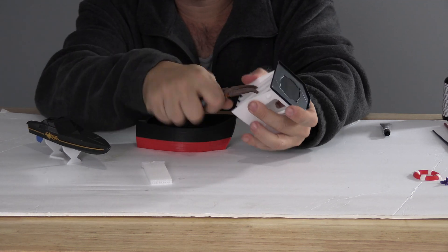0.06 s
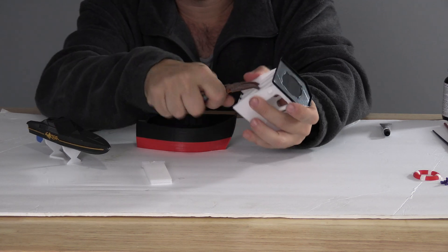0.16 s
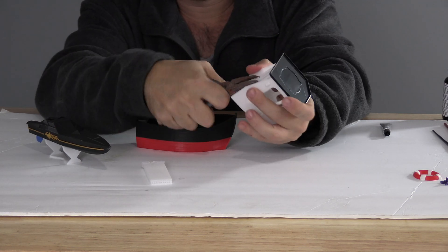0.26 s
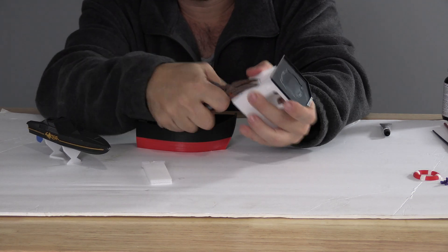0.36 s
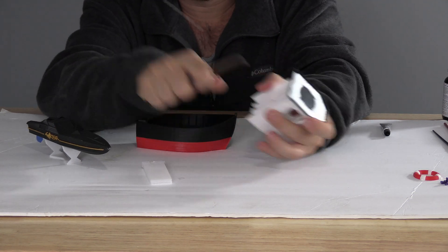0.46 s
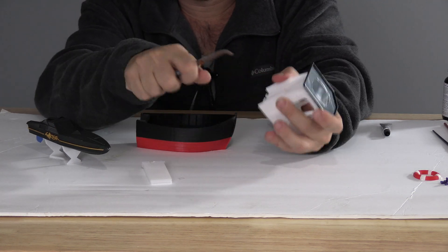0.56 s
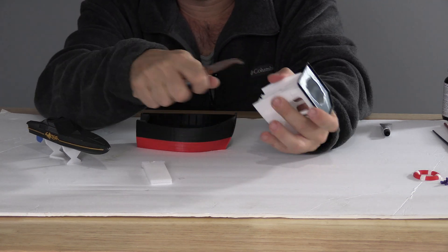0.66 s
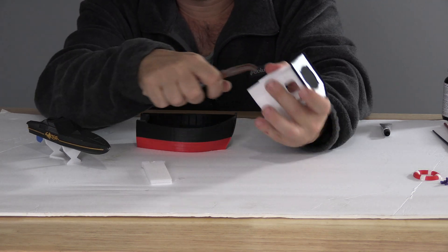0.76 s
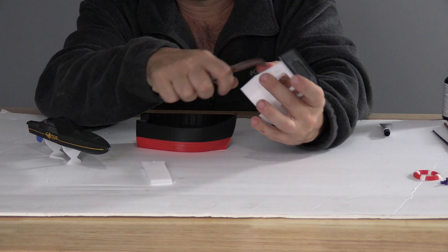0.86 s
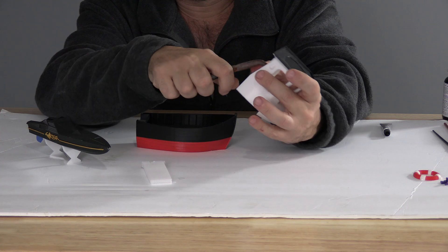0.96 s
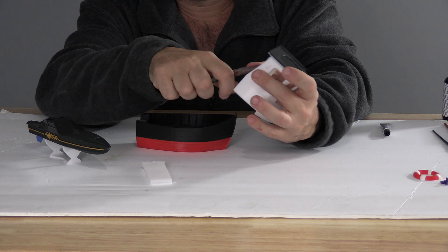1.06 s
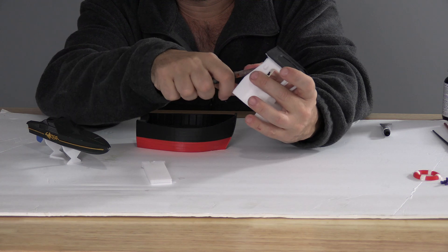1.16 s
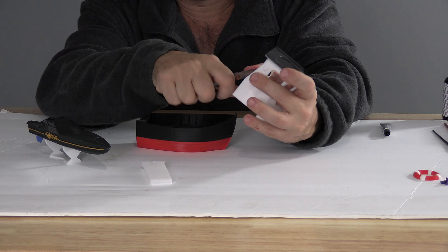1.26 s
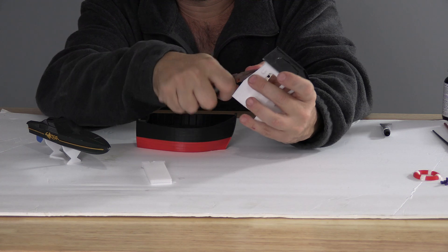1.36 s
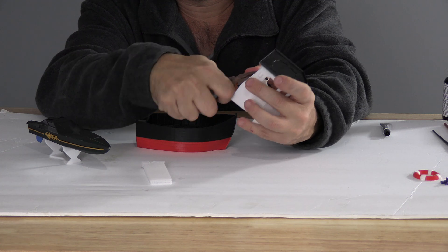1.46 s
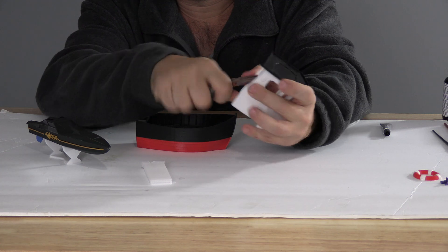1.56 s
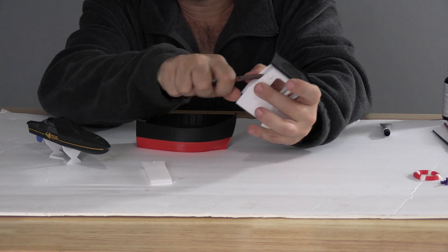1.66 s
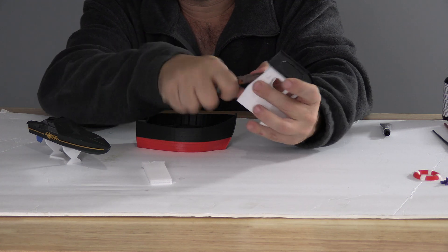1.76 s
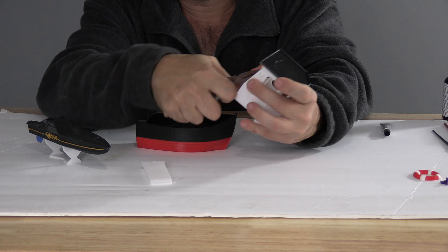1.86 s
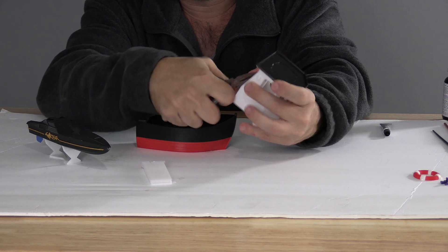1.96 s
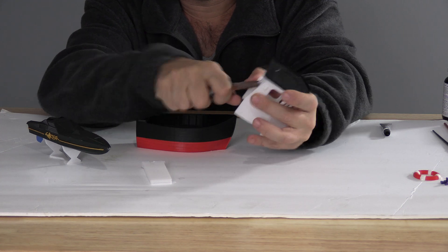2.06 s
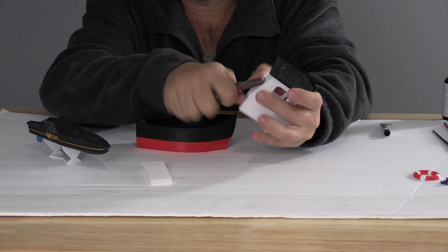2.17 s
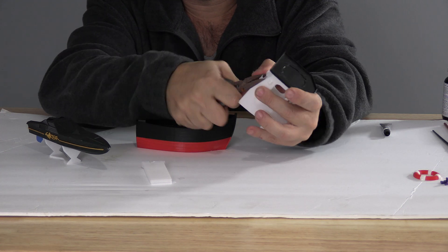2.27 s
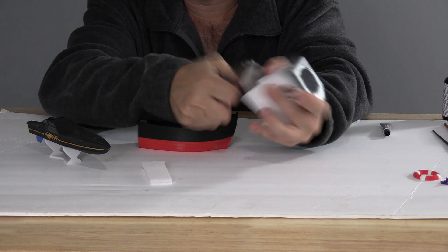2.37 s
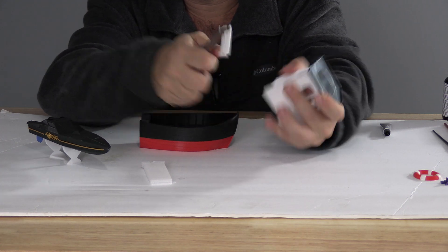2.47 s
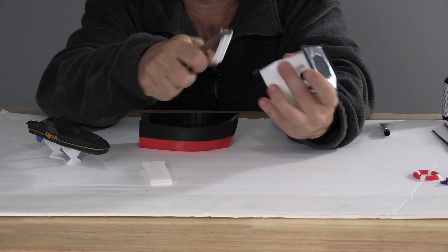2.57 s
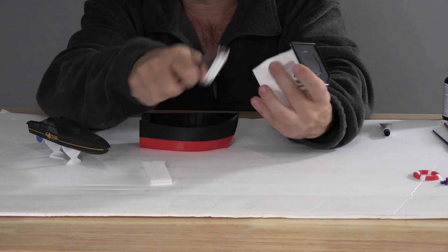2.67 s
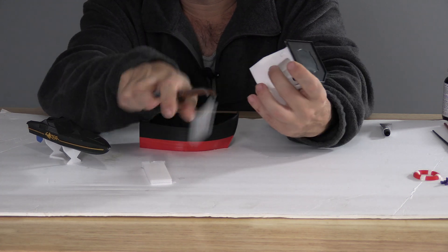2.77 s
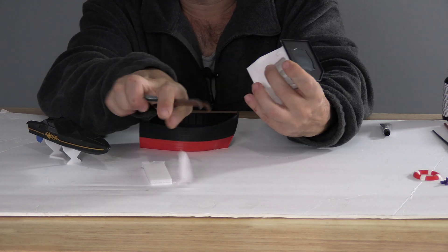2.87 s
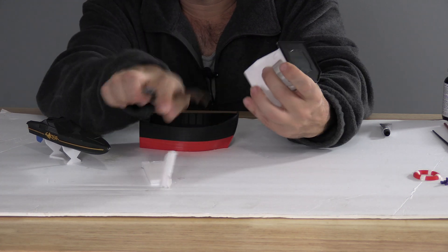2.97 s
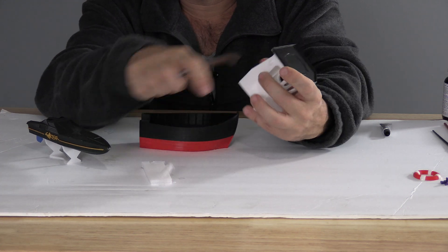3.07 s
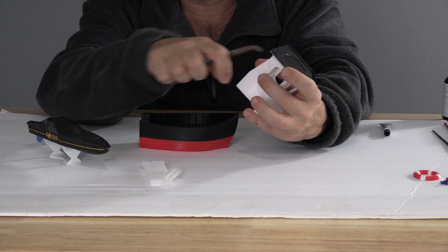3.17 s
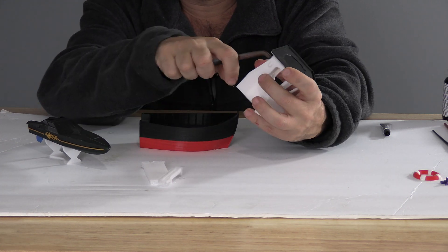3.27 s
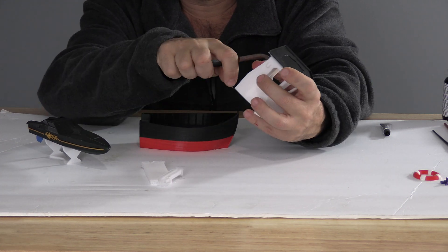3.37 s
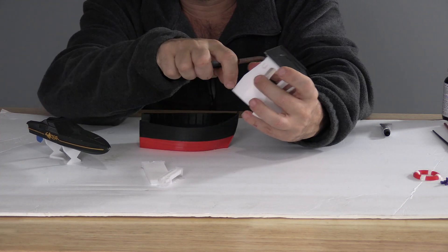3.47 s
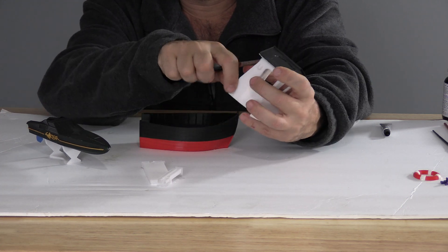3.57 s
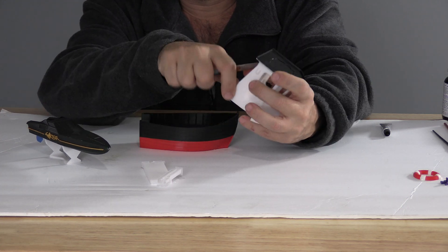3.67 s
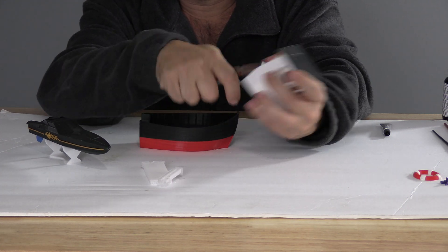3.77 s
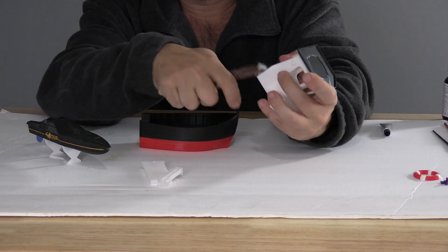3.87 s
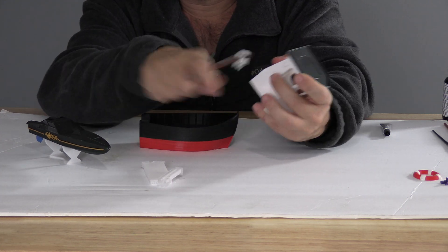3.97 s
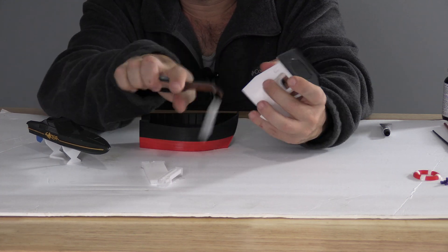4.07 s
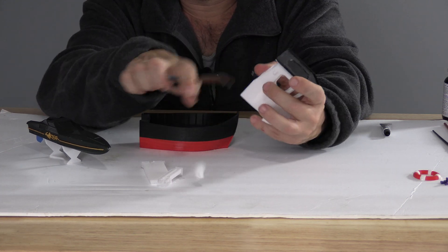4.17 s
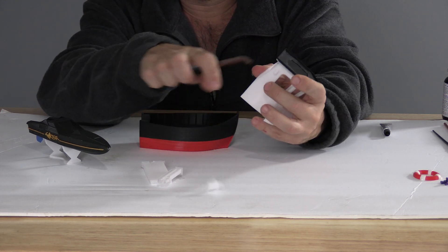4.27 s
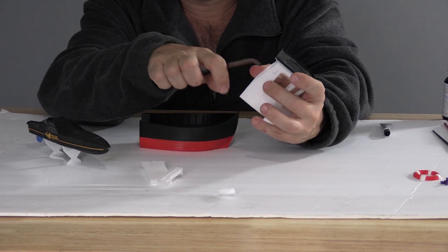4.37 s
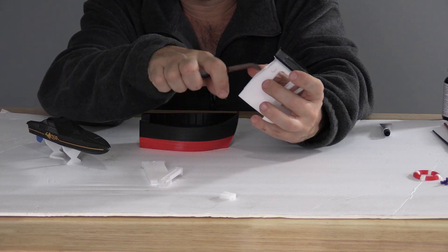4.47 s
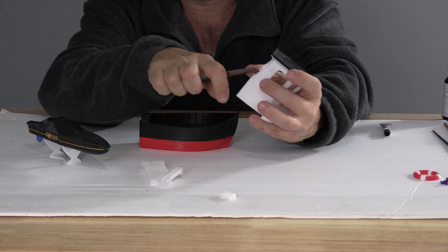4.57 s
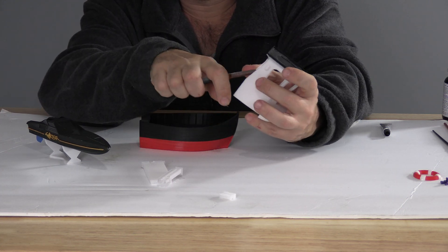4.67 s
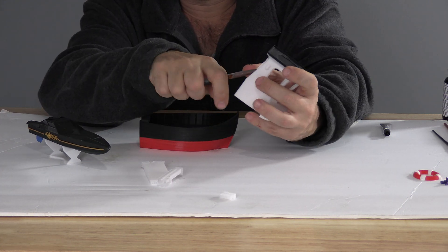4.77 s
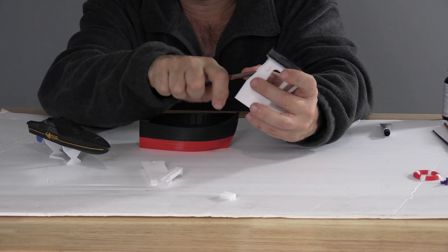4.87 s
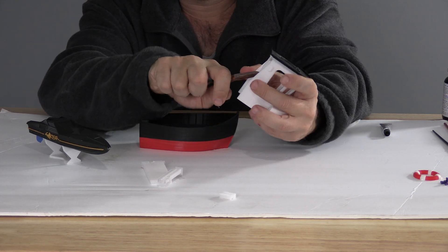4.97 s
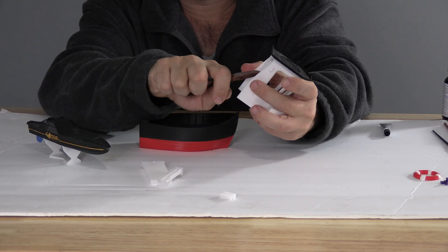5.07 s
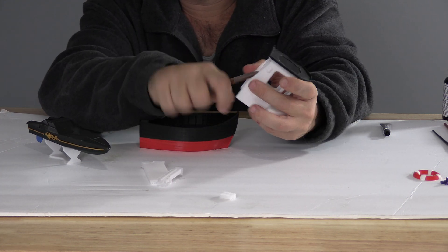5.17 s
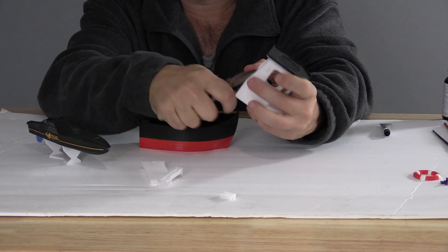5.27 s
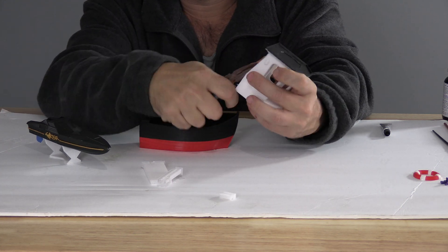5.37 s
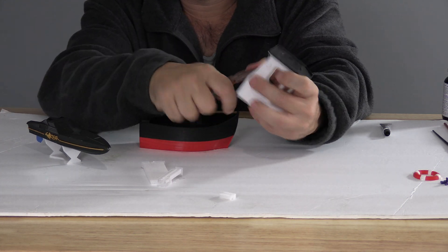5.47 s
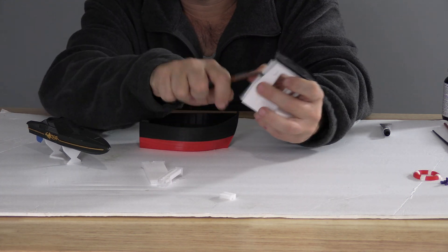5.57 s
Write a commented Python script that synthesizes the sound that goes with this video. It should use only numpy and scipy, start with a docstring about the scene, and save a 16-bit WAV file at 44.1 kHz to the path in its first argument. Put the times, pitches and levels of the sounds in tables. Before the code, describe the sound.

Close, dry bursts of brittle plastic cracks and loud snaps from pliers, then light clattering bits on a covered tabletop and more snaps.

```python
"""Pliers break plastic supports out of a hollow printed part, close to a microphone above a table in a small room.
Struts crack at once and whole blocks soon snap away: short noisy forces ring the part's resonances.
Near 3 s, and again after 4 s, loose pieces bounce on the table in shrinking hops; then come two more snaps.
Scrapes made of tiny slips, gliding squeaks, dull knocks and sleeve rustle fall in between, over steady room air.
A fast limiter flattens the loudest peaks."""
import sys
import numpy as np
from scipy import signal
from scipy.fft import rfft, irfft
from scipy.io import wavfile
from scipy.ndimage import uniform_filter1d, minimum_filter1d

SR = 44100
rng = np.random.default_rng(int(sys.argv[2]) if len(sys.argv) > 2 else 0)


def master_out(mix):
    """Clip the mix to full scale and print it as 16-bit PCM to the path in sys.argv[1]."""
    frames = np.transpose(np.atleast_2d(mix))
    ceiling = np.clip(frames, -1, 1)
    pcm = np.round(ceiling * 32767).astype(np.int16)
    wavfile.write(sys.argv[1], SR, pcm)


N = 248283
SIZE = 8192  # samples in one event, 0.186 s
T = np.arange(SIZE) / SR


def undb(db):
    """Logarithmic level: decibels to amplitude gain."""
    return 10 ** (np.asarray(db) / 20)


def unit(x):
    """Normalization: scale to rms 1."""
    return x / np.sqrt(np.mean(x ** 2) + 1e-30)


def smooth_twice(x, size):
    """Low-pass averaging: two running means in a row."""
    return uniform_filter1d(uniform_filter1d(x, size=size), size=size)


def add(track, start_s, sound):
    """Superposition: mix a sound into a track at a time."""
    i = max(int(start_s * SR), 0)
    track[i:i + len(sound)] += sound[:max(N - i, 0)]


def along(points, hz):
    """Interpolation of (frequency, value) points on a logarithmic frequency axis."""
    f, value = np.transpose(points)
    return np.interp(np.log(hz + 1), np.log(f), value)


def bins(size):
    """Fourier analysis: frequencies of a spectrum in Hz."""
    return np.fft.rfftfreq(size, 1 / SR)


def causal(gain):
    """Minimum phase: the response with these gains that starts at once and then rings."""
    cepstrum = irfft(np.log(gain + 1e-12))
    cepstrum[1:SIZE // 2] *= 2
    cepstrum[SIZE // 2 + 1:] = 0
    return np.exp(rfft(cepstrum))


def lorentzian(hz, width_hz):
    """Damped resonance: power against frequency, 1 at the peak and half at the edges of the width."""
    return 1 / (1 + (2 * (bins(SIZE) - hz) / width_hz) ** 2)


def resonance(hz, width_hz, db):
    """Single mode: gain that lifts one resonance above a flat response."""
    return np.sqrt(1 + undb(db) ** 2 * lorentzian(hz, width_hz))


SCATTER_DB = 3  # standard deviation of mode levels and tick levels
DETUNE = .012  # standard deviation of mode frequencies, as a fraction
RIPPLE_DB = 2.6  # rms ripple of the colour


def body(colour, modes):
    """Modal response: every contact point and grip weights and shifts the resonances a little differently."""
    f, power = bins(SIZE), 1
    for hz, width_hz, db in modes:
        level_shift, pitch_shift = rng.standard_normal(2)
        peak = undb(db + SCATTER_DB * level_shift) ** 2 * 2
        power = power + peak * lorentzian(hz * (1 + DETUNE * pitch_shift), width_hz)
    # many weak modes add a random ripple to the colour, drawn anew for every sound
    weak_modes = unit(smooth_twice(rng.standard_normal(len(f)), 26))
    return undb(along(colour, f) + RIPPLE_DB * weak_modes) * np.sqrt(power)


def fracture(crumble_s, crumble_db, burst_s=0.00095, grain_db=5):
    """Brittle fracture: a very short burst of force, then uneven micro-cracks as the edges let go."""
    burst, grains = rng.standard_normal((2, SIZE))
    grain_levels = np.repeat(rng.standard_normal(SIZE // 32), 32)  # one level per 32 samples
    sizes = unit(undb(grain_db * grain_levels))
    crumbling = undb(crumble_db) * grains * sizes * np.exp(-T / crumble_s)
    return burst * np.exp(-T / burst_s) + crumbling


# borders between the bass, mid, crack and top bands: border_hz
BAND_EDGES = [1200, 5500, 9000]


def strike(force, gain, band_db, span_s, evenness=0.18):
    """Forced vibration: a force rings an object, and each of four bands gets its own strength over span_s.
    Gives the sound towards the microphone and the sound sent all round the room."""
    band = np.searchsorted(BAND_EDGES, bins(SIZE))
    push = rfft(force)
    ripple = np.sqrt(uniform_filter1d(np.abs(push) ** 2, size=15) + 1e-12)
    sounds = []
    # parts of a force interfere in any one direction; summed over all directions their ripple evens out
    for shape in (gain / ripple ** evenness, gain / ripple):
        power = np.bincount(band, np.abs(push * shape) ** 2) * 2 / (SIZE * span_s * SR)
        correction_db = np.asarray(band_db) - 10 * np.log10(power)
        balance_db = uniform_filter1d(correction_db[band], size=90)  # soft borders between bands
        sounds.append(irfft(push * causal(shape * undb(balance_db))))
    return sounds


# resonances of the hollow part in the steel jaws, for snaps and cracks: pitch_hz, width_hz, level_db
PART_MODES = [(430, 110, -9.5), (950, 120, 1), (1660, 290, -1), (2017, 41, 3), (2830, 19, 10.5),
              (3070, 360, 4.5), (3550, 540, -0.5), (4080, 74, -5), (4600, 200, -3), (7256, 510, -2.5),
              (7900, 350, -4.5), (10240, 900, -4), (11040, 800, 3), (15000, 1100, -21)]
# broad colour of a snap: pitch_hz, level_db
SNAP_COLOUR = [(30, -0.5), (150, 2), (330, 8), (600, 7), (1200, 0.5), (2400, -5.5), (3100, -4.5),
               (4400, 3.5), (6000, 5), (7400, 10.5), (8900, 5.5), (12500, 2.5), (15600, 2.5),
               (17000, -29.5)]
# a block of support breaks away:
# start_s, level_db, bass_db (relative to the snap), crumble_s, ring_db (added for wall and jaws)
SNAPS = [(0.5280, 5, -38.5, 0.0023, 6), (1.547, -4.5, -35.5, 0.00057, 1.5), (1.9340, -4, -28, 0.0055, -2.5),
         (1.9698, -6, -50, 0.00085, -5.5), (2.041, -11.5, -34.5, 0.0022, -3.5),
         (2.3942, -7, -31.5, 0.0051, -2), (2.4754, -3.5, -33, 0.0075, 0.5),
         (5.1238, -2, -33.5, 0.0026, -19), (5.4069, -1, -26.5, 0.0043, -4)]


def snaps(mid_db=-19.5, crack_db=-12, top_db=-17, dulling=.5, room_db=-12,
          thump_db=-34, thump_hz=42, thump_s=0.0064,
          wall_hz=2980, wall_width_hz=350, wall_db=4, jaw_hz=7600, jaw_width_hz=900, jaw_db=-1):
    """Impulsive excitation: blocks ring wall and jaws; bigger breaks are duller and push the overloaded
    microphone into a louder low thump."""
    out = np.zeros((2, N))
    thump = undb(thump_db) * np.sin(2 * np.pi * thump_hz * T) * np.exp(-T / thump_s)
    for start_s, db, bass_db, crumble_s, ring_db in SNAPS:
        wall = resonance(wall_hz, wall_width_hz, wall_db + ring_db)
        jaws = resonance(jaw_hz, jaw_width_hz, jaw_db + ring_db)
        force = fracture(crumble_s, crumble_db=-5, burst_s=0.002)
        gain = body(SNAP_COLOUR, PART_MODES) * wall * jaws
        band_db = [bass_db, mid_db, crack_db, top_db - dulling * db]
        near, spill = strike(force, gain, band_db, span_s=0.0043)
        add(out[0], start_s, undb(db) * (near + thump))
        add(out[1], start_s, undb(db + room_db) * spill)
    return out


# the jaws bear down and the lattice ticks faintly: start_s, length_s, level_db (before scatter)
SQUEEZES = [(1.47, 0.028, -33.5), (2.148, .02, -41), (2.223, 0.037, -41.5), (3.75, .012, -45.5),
            (5.573, 0.042, -62)]
# a strut that only ticks: share passed to the hollow part, wall ring, strut ping
TICK_PART_DB, TICK_RING_HZ, TICK_PING_HZ = -23, 3300, 8600


def ticks(count=3):
    """Progressive failure: each squeeze breaks a few tiny struts at uneven moments."""
    rows = []
    for start_s, length_s, db in SQUEEZES:
        for k in range(count):
            tick_s = start_s + length_s * (k + rng.random()) / count
            tick_db = db + SCATTER_DB * rng.standard_normal()
            rows.append((tick_s, tick_db, TICK_PART_DB, TICK_RING_HZ, TICK_PING_HZ))
    return rows


# broad colour of a crack: pitch_hz, level_db
CRACK_COLOUR = [(30, -8), (150, -7.5), (400, 0), (1200, -2), (2400, -8.5), (3400, -3.5), (5500, -1),
                (7900, 5.5), (9200, -2.5), (11200, -3), (13200, -3.5), (15600, -6), (17000, -39.5)]
# a strut cracks under the jaws:
# start_s, level_db, part_db (share passed to the hollow part), ring_hz (wall), ping_hz (strut)
CRACKS = [(0.0123, -8.5, -16.5, 2950, 6650), (0.151, -15.5, -10.5, 3460, 7500),
          (0.1757, -21.5, -16, 4000, 8900), (0.495, -18.5, -14.5, 3800, 7900),
          (0.519, -13.5, -12.5, 3300, 7800), (0.787, -39, -14, 3900, 8600), (0.88, -45.5, -16, 4030, 9950),
          (1.072, -36.5, -15.5, 3180, 7040), (1.3282, -40.5, -19, 1430, 7630),
          (1.4226, -35.5, -26, 5360, 10600), (1.4559, -16, -27.5, 5130, 8100),
          (1.4868, -27.5, -19.5, 3680, 11700), (1.5015, -16.5, -27.5, 3520, 7860),
          (1.5209, -20.5, -18.5, 3800, 11500), (1.67, -35.5, -7, 3340, 7100),
          (1.6927, -12.5, -16, 3030, 7760), (1.738, -10, -15, 3030, 8900), (1.7712, -17, -17.5, 2840, 7900),
          (1.8422, -30.5, -7, 2840, 7100), (2.0468, -26, -11.5, 4640, 11400),
          (2.222, -24, -25.5, 3100, 7500), (2.2754, -25.5, -30.5, 3550, 11200),
          (2.2872, -23, -8.5, 2960, 7130), (2.8248, -28, -26, 3500, 10030), (3.4528, -46, -30, 2900, 8100),
          (3.5227, -43, -18, 2840, 7350), (3.6773, -38.5, -9, 5360, 7100),
          (3.8304, -28.5, -24.5, 3070, 7640), (3.8461, -36, -11, 1400, 7410),
          (3.9369, -12, -28.5, 2920, 7400), (3.9402, -16.5, -14.5, 2870, 7430),
          (4.1124, -52, -13.5, 3730, 7440), (4.782, -38.5, -9.5, 3170, 6600),
          (4.8861, -33.5, -12, 3200, 8040), (5.065, -17.5, -32.5, 5180, 6900),
          (5.0804, -10.5, -22, 2970, 6930), (5.348, -31.5, -10.5, 3980, 6220),
          (5.52, -10.5, -20, 4770, 7400), (5.5647, -21.5, -25, 3400, 7300),
          (5.5975, -21.5, -13, 3300, 7750)]


def cracks(bass_db=-15, crack_db=-12, top_db=-16.0, top_db_per_octave=17, usual_ping_hz=7500, room_db=-14.0,
           ring_width_hz=160, ring_db=8, ping_width_hz=600, ping_db=5):
    """Coupled resonance: each strut rings the wall it stood on; the shorter it is, the higher and brighter its ping."""
    out = np.zeros((2, N))
    for start_s, db, part_db, ring_hz, ping_hz in [*CRACKS, *ticks()]:
        force = fracture(0.006, crumble_db=-12, burst_s=.001)
        wall = resonance(ring_hz, ring_width_hz, ring_db)
        strut = resonance(ping_hz, ping_width_hz, ping_db)
        gain = body(CRACK_COLOUR, PART_MODES) * wall * strut
        top = top_db + top_db_per_octave * np.log2(ping_hz / usual_ping_hz)
        band_db = db + np.array([part_db + bass_db, part_db, crack_db, top])
        near, spill = strike(force, gain, band_db, span_s=.004)
        add(out[0], start_s, near)
        add(out[1], start_s, spill * undb(room_db))
    return out


# the gripped part jolts in the hand: start_s, pitch_hz, level_db, decay_s
KNOCKS = [(0.4944, 430, -32, 0.0056), (1.548, 696, -34.5, .005), (1.738, 945, -39.5, 0.02),
          (1.934, 260.7, -31.5, 0.0033), (3.847, 200, -39, 0.0019), (4.781, 474, -36, 0.0037),
          (5.598, 449, -38, 0.0049)]


def knocks(room_db=-12):
    """Damped oscillation: dull, quickly dying rings of the whole part against the fingers."""
    out = np.zeros(N)
    for start_s, hz, db, decay_s in KNOCKS:
        add(out, start_s, undb(db) * np.sin(2 * np.pi * hz * T) * np.exp(-T / decay_s))
    return np.array([out, out * undb(room_db)])


# resonances of a loose piece on the table: pitch_hz, width_hz, level_db
PIECE_MODES = [(718, 43, -1.5), (1757, 260, 6.5), (2900, 39.5, 8), (3664, 480, -9), (4265, 312, -8),
               (4760, 160, -7)]
# broad colour of a loose piece: pitch_hz, level_db
PIECE_COLOUR = [(30, -44), (150, -26.5), (350, -10.5), (1000, -8), (3500, 4.5), (4700, 3), (5800, -10.5),
                (11000, -10.5), (15600, -24), (17000, -67)]
# an edge of a loose piece hits the table and goes on bouncing:
# start_s, level_db, flight_s (first hop), loss_db (per doubling of the landing count), ring_hz, ring_db
DROPS = [(2.948, -36.5, 0.082, 13.5, 3220, -5), (2.9575, -33, 0.14, 16.5, 2700, -8),
         (3.1507, -40, .076, 3, 3550, 10.5), (3.1663, -37, 0.092, 13.5, 3520, 14.5),
         (3.1984, -45, 0.14, 9.5, 3620, 7.5), (3.2388, -40.5, 0.15, 28, 3120, 10.5),
         (4.2588, -25.5, 0.14, 10, 3750, 0), (4.4304, -47, 0.077, 0.5, 3300, 7.5),
         (4.5664, -50.5, .0188, 0, 2920, 16)]
REBOUND = .587  # length of a hop relative to the one before


def bounces(count=6, fade_db=1.5, bass_db=-7, bass_slope=0.17, usual_db=-42, treble_db=-11.0, top_db=-17,
            room_db=-10.0, ring_width_hz=340):
    """Inelastic rebound: light pieces clatter on the covered table in ever weaker and shorter hops.
    Hard landings clack thinly; soft ones sound rounder."""
    out = np.zeros((2, N))
    for landing_s, first_db, flight_s, loss_db, ring_hz, ring_db in DROPS:
        for k in range(count):
            db = first_db - loss_db * np.log2(k + 1) - fade_db * k
            force = fracture(0.005, crumble_db=-7, burst_s=0.002)
            gain = body(PIECE_COLOUR, PIECE_MODES) * resonance(ring_hz, ring_width_hz, ring_db)
            bass = bass_db - bass_slope * (db - usual_db)
            band_db = db + np.array([bass, 0, treble_db, top_db])
            near, spill = strike(force, gain, band_db, span_s=0.0035)
            add(out[0], landing_s, near)
            add(out[1], landing_s, spill * undb(room_db))
            landing_s = landing_s + flight_s * REBOUND ** k
    return out


# resonances that sliding jaws excite: pitch_hz, width_hz, level_db
SLIDE_MODES = [(724, 81, 13.5), (1420, 82, 25), (1770, 170, 17.5), (2840, 47, 19), (3550, 510, -5),
               (7450, 560, -23)]
# broad colour of a scrape: pitch_hz, level_db
SCRAPE_COLOUR = [(30, -35), (200, -12), (650, -6), (1200, -26.5), (2800, -7.5), (4200, -1.5), (6000, 0),
                 (7800, 7.5), (9000, -5.5), (15600, -12.5), (17000, -41.5)]
# the jaws slide or tear along the plastic: start_s, length_s (cut off after SIZE samples), level_db, bright_db
SCRAPES = [(1.2, 0.052, -58.5, 1.5), (1.288, 0.13, -74, 3), (2.149, 0.03, -60, -1),
           (3.477, 0.22, -73, -1.5), (3.614, 0.061, -54.5, -0.5), (3.628, 0.011, -50, 7.5),
           (3.833, .047, -59, 2), (3.905, .019, -37, 8.5), (4.688, 0.14, -70, -1.5)]


def scrapes(usual_db=-60, usual_slips_per_s=1000, doubling_db=13, bass_db=-4, treble_db=-3, top_db=-8,
            slip_db=4, room_db=-12):
    """Dry friction: jaws catch and slip over printed layers in tiny clicks, denser the harder the stroke."""
    out = np.zeros((2, N))
    for start_s, length_s, db, bright_db in SCRAPES:
        stroke = np.sqrt(np.sin(np.pi * np.minimum(T / length_s, 1)) + 1e-12)
        slips_per_s = usual_slips_per_s * 2 ** ((db - usual_db) / doubling_db)
        happens = rng.random(SIZE) < slips_per_s / SR
        sizes = undb(slip_db * rng.standard_normal(SIZE))
        slips = happens * sizes * rng.choice([-1, 1], SIZE)
        band_db = db + np.array([bass_db - 2 * bright_db, 0, treble_db + bright_db, top_db + bright_db])
        near, spill = strike(slips * stroke, body(SCRAPE_COLOUR, SLIDE_MODES), band_db, span_s=length_s)
        add(out[0], start_s, near)
        add(out[1], start_s, spill * undb(room_db))
    return out


# the plastic sticks and slips fast enough to squeak: start_s, length_s, first_hz, last_hz, level_db (peak)
SQUEAKS = [(1.497, .028, 3740, 3450, -42.5), (3.616, 0.061, 634, 720, -48),
           (3.905, .018, 4024, 2934, -28.5)]


def squeaks(jitter=.05, room_db=-20):
    """Stick-slip oscillation: brief, unsteady tones that glide quickly at first and then settle."""
    out = np.zeros(N)
    for start_s, length_s, first_hz, last_hz, db in SQUEAKS:
        done = np.minimum(T / length_s, 1)
        glide_hz = last_hz + (first_hz - last_hz) * (1 - done) ** 2
        wobble = unit(uniform_filter1d(rng.standard_normal(SIZE), size=60))
        hz = glide_hz * (1 + jitter * wobble)
        tone = np.sin(2 * np.pi * np.cumsum(hz) / SR)
        add(out, start_s, undb(db) * np.sin(np.pi * done) * tone)
    return np.array([out, out * undb(room_db)])


def noise(colour):
    """Spectral shaping: steady random noise of one colour, at rms 1."""
    return unit(irfft(rfft(rng.standard_normal(N)) * undb(along(colour, bins(N))), N))


# broad colour of the sleeves: pitch_hz, level_db
SLEEVE_COLOUR = [(30, -19), (130, -8), (250, -3.5), (500, 2), (900, -5.5), (2000, -14), (6000, -17),
                 (15000, -30)]
# an arm moves: middle_s, length_s, level_db (sleeve rustle before rest level and flutter)
ARM_MOVES = [(0.351, 1, -71.5), (1.68, 0.5, -69), (2.35, 0.11, -67), (3.35, 0.68, -70), (4.606, 1, -77),
             (5.6, 0.42, -60)]


def sleeves(flutter_db=2, rest_db=-81):
    """Friction noise: fleece rubs unevenly, swelling and fading with each move of an arm."""
    t = np.arange(N) / SR
    motion = undb(rest_db)
    for middle_s, length_s, db in ARM_MOVES:
        motion = motion + undb(db) * np.exp(-(2 * (t - middle_s) / length_s) ** 2)
    flutter = unit(smooth_twice(rng.standard_normal(N), 900))
    return noise(SLEEVE_COLOUR) * motion * undb(flutter_db * flutter - 1.5)


# broad colour of the quiet room: pitch_hz, level_db
AIR_COLOUR = [(20, -3.5), (60, -2), (130, -5.5), (220, 0.5), (400, -3.5), (700, -8.5), (1200, -19),
              (2600, -21.5), (10500, -19), (16000, -54.5)]


def air(level_db=-74):
    """Stationary background noise: the quiet room at a constant rms level."""
    return undb(level_db) * noise(AIR_COLOUR)


# room decay: pitch_hz, t60_s
ROOM_DECAY = [(100, 0.63), (300, 0.3), (800, 0.41), (2000, 0.38), (5000, 0.34), (8000, 0.29), (15000, 0.24)]


def room(x, gap_s=0.003, build_s=0.0013, table_s=0.008, table_db=-11):
    """Reverberation: an early reflection from the table and a short diffuse tail, decaying by octave."""
    t = np.arange(SR // 2) / SR
    spectrum, f = rfft(rng.standard_normal(len(t))), bins(len(t))
    octave = np.round(np.log2(np.maximum(f, 125) / 125))
    tail = np.zeros(len(t))
    for k in np.unique(octave):
        t60_s = along(ROOM_DECAY, 125 * 2 ** k)
        tail += irfft(spectrum * (octave == k), len(t)) * undb(-60 * t / t60_s)
    tail = tail * np.clip((t - gap_s) / build_s, 0, 1)
    tail = tail / np.sqrt(np.sum(tail ** 2))
    tail[int(table_s * SR)] += undb(table_db)
    return signal.fftconvolve(x, tail)[:N]


def scene():
    """Superposition of direct and reverberant fields: the work at the table, its echo and the quiet room."""
    direct, spill = snaps() + cracks() + knocks() + bounces() + scrapes() + squeaks()
    return (direct + room(spill) + sleeves() + air())[None]


def record(dry, ceiling=.235, top_hz=15900):
    """Peak limiting and low-pass filtering: a fast limiter holds the peaks down, then the top is cut."""
    need = np.minimum(1, ceiling / (np.abs(dry) + 1e-9))
    gain = uniform_filter1d(minimum_filter1d(need, size=17), size=17)
    low_pass = signal.ellip(8, .2, 70, top_hz, fs=SR, output="sos")
    return signal.sosfilt(low_pass, dry * gain)


dry = scene()
out = record(dry)
master_out(out)
```